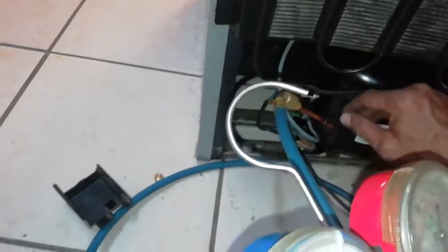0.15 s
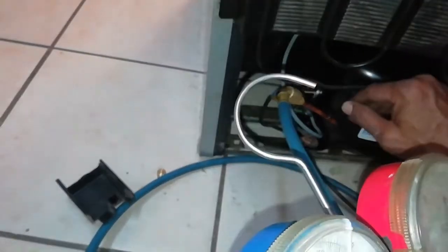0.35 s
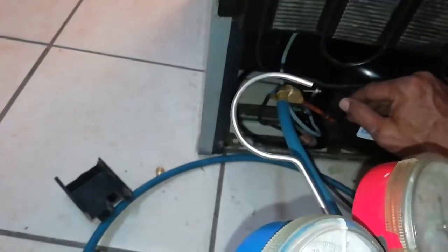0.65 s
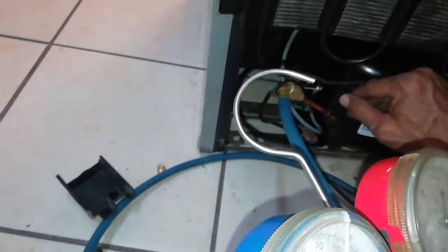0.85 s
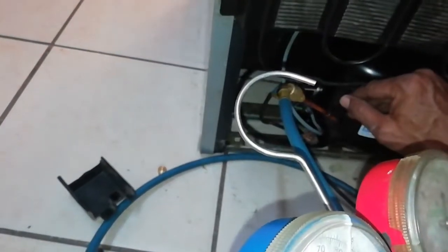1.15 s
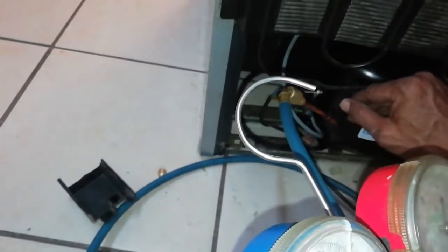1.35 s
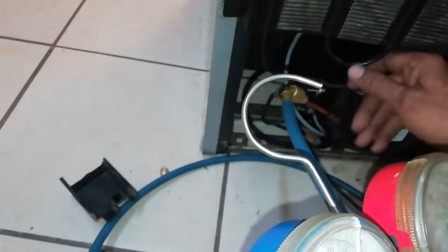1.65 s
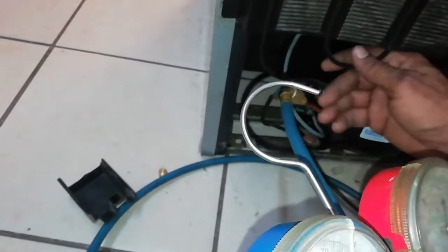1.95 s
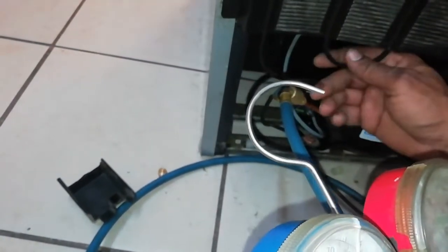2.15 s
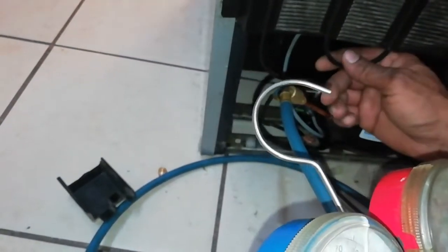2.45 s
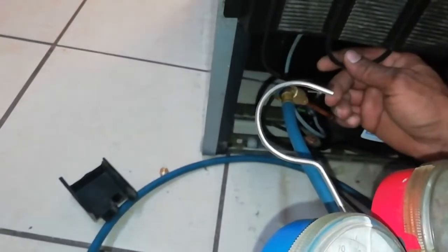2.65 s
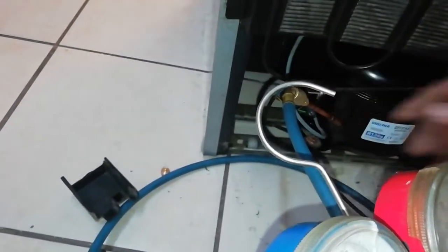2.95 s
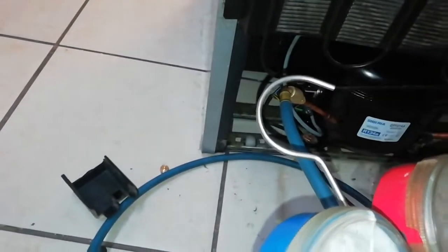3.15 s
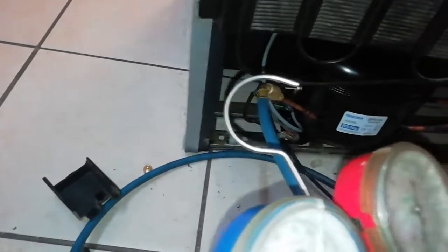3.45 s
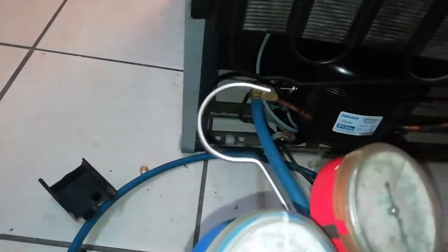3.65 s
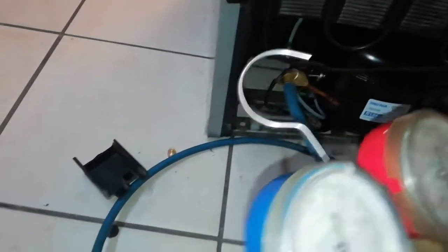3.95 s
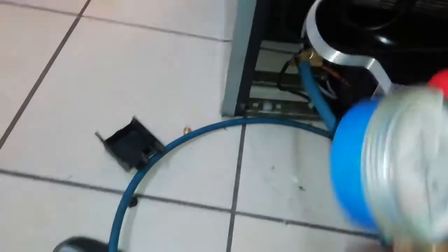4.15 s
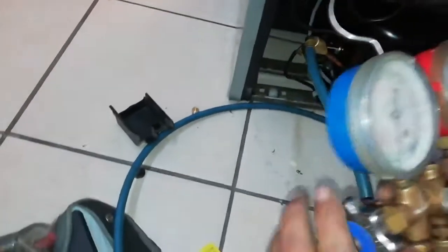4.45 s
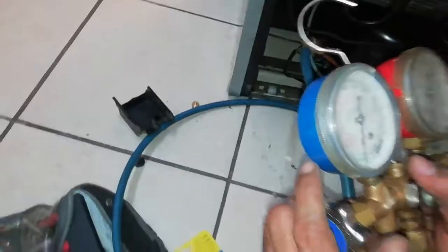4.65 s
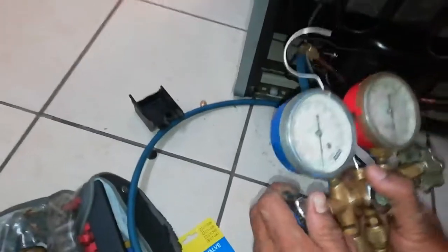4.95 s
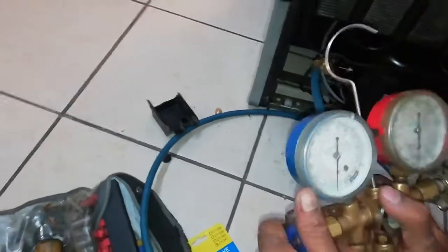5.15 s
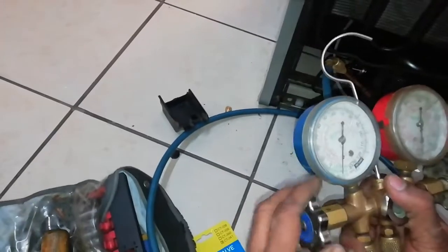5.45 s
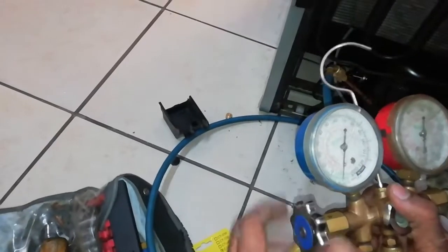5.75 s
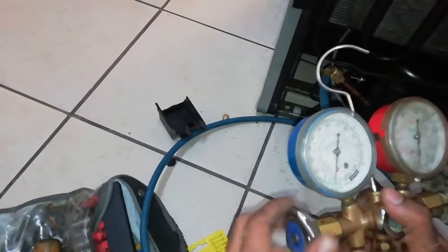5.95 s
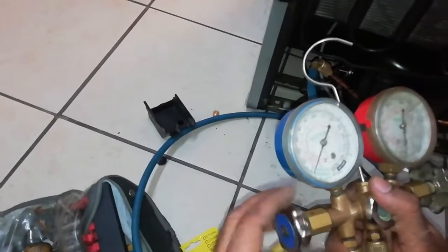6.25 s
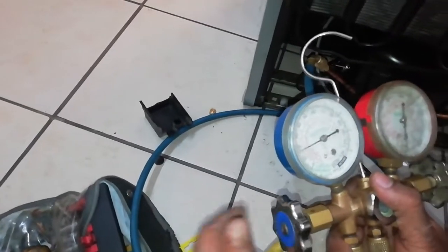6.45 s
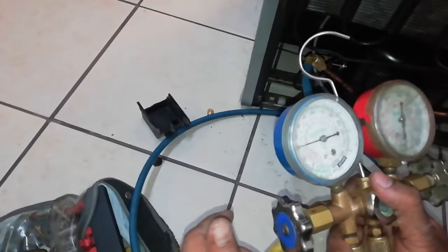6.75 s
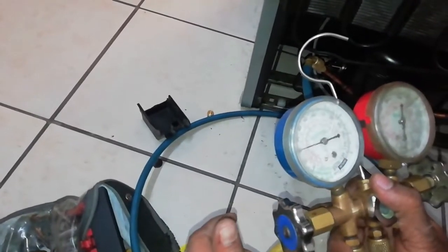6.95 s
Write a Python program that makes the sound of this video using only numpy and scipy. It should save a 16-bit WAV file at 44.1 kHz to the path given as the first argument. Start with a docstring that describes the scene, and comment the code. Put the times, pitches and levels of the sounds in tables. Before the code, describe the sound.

A refrigerator compressor runs throughout in a tiled room: soft low hum, thin raspy buzz and drifting high whines, close to a handheld microphone. Around 1.65-1.75 s a hand lightly clatters the sheet metal; at 1.9 and 2.15 s dry fingers swish on tubing. At 2.8 s a tube is flicked with a brief ring, followed by low cabinet thuds and a scuff to about 3.1 s. A dull tap comes at 3.26 s, soft thumps at 3.75-3.9 s. Faint brass sliding starts near 4.1 s, with knocks and rasp at 4.8 s. At 5.1 s a hard, bright clack snaps amid a rattling cluster, by far the loudest moment. Hollow little knocks continue to 6.1 s. From 6 s a valve opens: bright gas hiss grows to about 6.5 s, with airy rush, half-whistles and another knock cluster at 6.35-6.5 s, over a low drone climbing in pitch. The hiss eases slightly until the end near 7 s.

```python
"""A refrigerator compressor hums, whines and buzzes in a tiled room: shaft-order tones plus a once-a-turn rattle.
Close by, a brass gauge set knocks (decaying modes), scrapes (resonant noise) and gives one sharp clack.
A hand brushes the tubing, bumps the cabinet and flicks the condenser tube: noise and impulses through resonances.
Then a valve opens: refrigerant hisses and half whistles as filtered noise, while a low drone climbs in pitch."""
import sys
import numpy as np
from scipy import signal
from scipy.fft import rfft, irfft, next_fast_len
from scipy.io import wavfile
from scipy.ndimage import uniform_filter1d, map_coordinates

SR = 44100
rng = np.random.default_rng(int(sys.argv[2]) if len(sys.argv) > 2 else 0)


def generate_wav(signal):
    """Clip the signal to [-1, 1] and save it as 16-bit WAV at the path in sys.argv[1]."""
    frames = np.transpose(np.atleast_2d(signal))
    scaled = np.clip(frames, -1, 1) * 32767
    pcm = np.round(scaled).astype(np.int16)
    wavfile.write(sys.argv[1], SR, pcm)


N = 313110
T = np.arange(N) / SR


def amp(db):
    """Amplitude gain of a level in dB."""
    return 10 ** (np.asarray(db) / 20)


def unit(x):
    """x scaled to rms 1."""
    return x / np.sqrt(np.mean(x ** 2) + 1e-20)


def pan(db):
    """Left and right gains of mean power 1; db is left over right."""
    return unit(amp([[db / 2], [-db / 2]]))


def along(points, hz):
    """Interpolates (Hz, value) points on a log frequency axis."""
    f, v = np.transpose(points)
    return np.interp(np.log(hz + 1), np.log(f), v)


def ramp(start_s, length_s, t=T):
    """A steady change from 0 to 1."""
    return np.clip((t - start_s) / length_s, 0, 1)


def arch(start_s, length_s):
    """A half-sine swell, silent outside its span."""
    return np.sin(np.pi * ramp(start_s, length_s))


def hump(peak_s, half_width_s):
    """A bell-shaped swell, down to 1/e at the half width."""
    return np.exp(-((T - peak_s) / half_width_s) ** 2)


def burst(start_s, t60, attack, t=T):
    """Envelope of a blow: exponential attack (s) and 60 dB decay time t60 (s)."""
    age = np.maximum(t - start_s, 0)
    decay = np.exp(-np.minimum(np.log(1000) * age / t60, 50))
    return (1 - np.exp(-age / attack)) * decay


def wobble(rate_hz):
    """A smooth random curve, rate_hz knots a second."""
    coarse = np.linspace(0, T[-1], 2 ** 13)
    knots = rng.standard_normal(2 ** 11)
    return np.interp(T, coarse, map_coordinates(knots, [coarse * rate_hz], mode="wrap"))


def filtered(x, response):
    """x times a complex response of frequency."""
    m = next_fast_len(N + SR // 2)
    return irfft(rfft(x, m) * response(np.fft.rfftfreq(m, 1 / SR)), m)[..., :N]


def coloured(x, spectrum):
    """x shaped by a (Hz, dB) response, at rms 1."""
    return unit(filtered(x, lambda hz: amp(along(spectrum, hz))))


def ringing(x, modes):
    """x through parallel resonances: (Hz, width Hz, dB)."""
    def response(f):
        return sum(amp(db) * 1j * f * w / (c * c - f * f + 1j * f * w) for c, w, db in modes)
    return filtered(x, response)


def rung_noise(modes):
    """Resonances driven by independent left and right noise, at rms 1."""
    return unit(ringing(rng.standard_normal((2, N)), modes))


# Stereo correlation of noise. Each row: frequency in Hz, left-right likeness 0..1.
LIKENESS = [(40, 1), (100, 0.93), (160, 0.87), (290, 0.01), (640, 0), (2000, 0)]


def noise(spectrum):
    """Stereo noise of rms 1, near mono in the bass."""
    def mid_side_gains(hz):
        turn = np.arccos(np.clip(along(LIKENESS, hz), -1, 1)) / 2
        return np.array([np.cos(turn), np.sin(turn)])
    mid, side = filtered(rng.standard_normal((2, N)), mid_side_gains)
    return coloured(np.array([mid + side, mid - side]), spectrum)


def slips():
    """Sparse tiny slips of skin and brass on metal: impulses at the same moments in both ears."""
    slips_per_s = 620
    return unit((rng.random(N) < slips_per_s / SR) * rng.standard_normal((2, N)))


def add(track, start_s, sound):
    """Mixes a short sound into a track in place."""
    part = track[round(start_s * SR):][:len(sound)]
    part += sound[:len(part)]


# Reverberation of the tiled room. Each row: frequency in Hz, t60 in s.
ROOM_T60 = [(150, 0.11), (1000, 0.52), (4000, 0.39), (9000, 0.27), (15000, 0.21)]


def room(x):
    """The tiled room's answer: a noise tail whose frequencies each die at their own speed."""
    hz, t, z = signal.stft(rng.standard_normal((2, SR // 2)), SR, nperseg=256)
    decay = np.exp(-np.log(1000) * t / along(ROOM_T60, hz)[:, None])
    tail = signal.istft(z * decay, SR, nperseg=256)[1]
    tail *= 1 - np.exp(-np.arange(tail.shape[1]) / SR / 0.0014)
    return signal.fftconvolve(x, tail / np.linalg.norm(tail[0]), axes=1)[:, :N]


def nearby(x, count):
    """Early reflections off the floor tiles and the cabinet comb the sound."""
    last_delay_s, echoes_db = 0.008, -5
    echoes = np.zeros((2, round(last_delay_s * SR)))
    for ear in echoes:
        delays = rng.integers(SR // 1000, len(ear), count)
        ear[delays] = amp(echoes_db) * rng.choice([-1, 1], count) / np.sqrt(count)
    echoes[:, 0] = 1  # direct sound
    return signal.fftconvolve(x, echoes / np.linalg.norm(echoes[0]), axes=1)[:, :N]


# Room noise spectrum. Each row: frequency in Hz, relative level in dB.
AIR_SPECTRUM = [(8, -22), (22, 7), (32, 5), (70, 3.5), (130, -5.5), (250, -5), (400, -13.5), (520, -17),
                (900, -21), (1500, -14.5), (3000, -14.5), (8000, -40.5), (15500, -53)]


def air():
    """Steady room noise, strongest in the bass."""
    return amp(-60.5) * noise(AIR_SPECTRUM)


DRONE_START_S, DRONE_HZ, CLIMB_HZ_PER_S = 5.65, 50.3, 7.4
RUMBLE_DB, RUMBLE_START_S, RUMBLE_RISE_S = -50.5, 5.54, 0.68
# Drone partials. Each row: multiple of the pitch, mean peak level in dB, loudest at in s, half width in s.
DRONE_HARMONICS = [(1, -49.5, 5.99, 0.3), (2, -52.5, 6.97, 0.58), (3, -53, 6.8, 0.28)]
# Rumble spectrum. Each row: frequency in Hz, relative level in dB.
RUMBLE_SPECTRUM = [(20, -9), (35, -5), (100, -7), (200, -7), (320, -1.5), (480, -14), (1000, -4),
                   (3000, -30.5)]


def drone():
    """A low, rough drone climbs steadily; its unsteady partials swell and fade over a rumble."""
    hz = DRONE_HZ + CLIMB_HZ_PER_S * np.maximum(T - DRONE_START_S, 0)
    phase = 2 * np.pi * np.cumsum(hz * (1 + 0.012 * wobble(13))) / SR
    partials = np.zeros(N)
    for k, db, peak_s, half_width_s in DRONE_HARMONICS:
        level = amp(db + 5.1 * wobble(14)) * hump(peak_s, half_width_s)
        partials += level * np.sin(k * phase)
    rumble = amp(RUMBLE_DB) * ramp(RUMBLE_START_S, RUMBLE_RISE_S) * noise(RUMBLE_SPECTRUM)
    return partials + rumble


VALVE_S, OPENING_S = 5.954, 0.58  # starts to open, takes this long
FLOW_DB, SAG_DB_PER_S = -39, 4  # gain at full opening; sags as the pressures even out


def flow_db():
    """Flow grows with the square of the valve's opening, then sags."""
    opening = np.maximum(ramp(VALVE_S, OPENING_S), 1e-3)
    sag_db = SAG_DB_PER_S * np.maximum(T - VALVE_S - OPENING_S, 0)
    return FLOW_DB + 20 * np.log10(opening ** 2) - sag_db


RUSH_DB, RUSH_PEAK_S, RUSH_HALF_WIDTH_S = -51, 6.33, 0.3  # surge as the hose fills
# Valve seat hiss. Each row: frequency in Hz, relative level in dB.
HISS_SPECTRUM = [(400, -11.5), (800, -37), (1500, -11), (2100, -12.5), (2600, -30), (3200, -20),
                 (4500, -15), (5600, -15.5), (6600, -6.5), (7500, -1.5), (8000, 4.5), (9300, -2),
                 (9750, -6.5), (12500, -11.5), (14200, -18), (15300, -65)]
# Whistling resonances of the seat. Each row: frequency in Hz, width in Hz, relative level in dB.
WHISTLE_MODES = [(4610, 50, -22), (7200, 110, -21), (7550, 52, -8), (7720, 82, -17), (8000, 85, -24),
                 (8750, 48, 1.5), (9080, 81, -9), (9380, 81, 4), (11780, 64, -19)]
# Gas in the hose. Each row: frequency in Hz, relative level in dB.
RUSH_SPECTRUM = [(300, -9), (1000, 2), (2000, -4.5), (2700, -16), (3500, -4), (5000, -5), (6500, -11),
                 (12000, -32)]


def refrigerant():
    """Gas rushes into the hose, hisses through the narrow valve seat and half whistles in it, in fits."""
    whistle = amp(-0.5 + wobble(8.7)) * pan(7) * rung_noise(WHISTLE_MODES)
    hiss = pan(2.3) * noise(HISS_SPECTRUM)
    seat = amp(flow_db() + 0.7 * wobble(28)) * (hiss + whistle)
    surge = amp(RUSH_DB + wobble(60)) * hump(RUSH_PEAK_S, RUSH_HALF_WIDTH_S)
    return seat + surge * noise(RUSH_SPECTRUM)


TUBE_S, TUBE_DB = 2.807, -46  # the hand leaves the tube with a flick
TAP_S, TAP_DB = 3.259, -44
# Condenser tube modes. Each row: frequency in Hz, relative level in dB, t60 in s.
TUBE_MODES = [(862, 1.5, 0.057), (1330, -16, 0.074), (1850, -9, .07), (2120, -3, .08), (2440, -2, .05),
              (3220, 0, 0.046), (3880, 0, 0.038)]
# Dull tap. Each row: frequency in Hz, relative level in dB.
TAP_SPECTRUM = [(80, -6), (250, 4), (600, -8), (1300, -4), (1900, -27), (5000, -40)]


def condenser():
    """The condenser tube rings briefly as the hand leaves it; a dull tap follows."""
    tube = np.zeros(N)
    t = np.arange(SR // 4) / SR
    for hz, db, t60_s in TUBE_MODES:
        tone = np.sin(2 * np.pi * (hz * t + rng.random()))
        add(tube, TUBE_S, amp(TUBE_DB + db) * burst(0, t60_s, attack=0.00068, t=t) * tone)
    return tube + amp(TAP_DB) * burst(TAP_S, t60=0.04, attack=0.00078) * noise(TAP_SPECTRUM)


CONTACT_DB = -10  # first touch, over the panel level
BOOM_DB, BOOM_T60_RATIO = -11, 2.16  # side wall: gain, t60 over the bump's
SCUFF_S, SCUFF_LENGTH_S, SCUFF_DB = 2.9, 0.068, -52  # the hand scuffs the grille
# Bumps on the cabinet. Each row: start in s, panel gain in dB, low thud gain in dB, thud pitch in Hz, t60 in s.
CABINET_BUMPS = [(1.652, -41, -74, 90, 0.7), (1.656, -45, -64, 90, 0.092), (1.668, -47, -57, 90, 0.076),
                 (1.72, -56, -62, 90, 0.12), (1.756, -49, -62, 90, 0.13), (2.796, -48, -62, 90, 0.29),
                 (2.86, -66, -48, 85, 0.3), (2.9, -57, -39, 92, 0.32), (2.98, -63, -41, 100, 0.2),
                 (3.76, -61, -36.5, 61, 0.19), (3.845, -73, -49, 58, 0.099), (3.894, -74, -45, 74, 0.18)]
# Sheet panels. Each row: frequency in Hz, relative level in dB.
PANEL_SPECTRUM = [(80, -36), (190, -0.5), (320, 1), (480, -1), (850, -4), (1050, -8), (1500, -4),
                  (2100, 2.5), (3500, -36), (9000, -5.5), (15000, -46)]
# Panel resonances. Each row: frequency in Hz, width in Hz, relative level in dB.
PANEL_RESONANCES = [(753, 42, -3), (933, 40, -5.5), (1288, 68, 0.5), (1414, 59, -1), (1613, 14, 3),
                    (1920, 35, -10), (2120, 28, -0.5), (3050, 32, -1.5), (4200, 29, -10)]
# Noise driving the side wall. Each row: frequency in Hz, relative level in dB.
THUD_SPECTRUM = [(25, -37), (60, 3), (90, 4.5), (130, -13), (190, -2), (400, -10), (1000, -54)]
# Big side wall. Each row: frequency in Hz, width in Hz, relative level in dB.
SIDE_WALL_MODES = [(187.7, 16, 0.5), (256, 16, -2.5), (295, 39, -9)]
# Grille resonances. Each row: frequency in Hz, width in Hz, relative level in dB.
GRILLE_MODES = [(1290, 23, 1), (1860, 61, -1), (3030, 55, -1)]


def cabinet():
    """A hand bumps the sheet metal: panels clatter, the side wall booms on, the frame thuds."""
    contact, clatter, boom, thud = np.zeros((4, N))
    for s, panel_db, thud_db, thud_hz, t60_s in CABINET_BUMPS:
        contact += amp(panel_db + CONTACT_DB) * burst(s, t60=0.024, attack=0.0004)
        clatter += amp(panel_db) * burst(s, t60_s, attack=0.0021)
        boom += (amp(panel_db) + amp(thud_db - 2)) * burst(s, BOOM_T60_RATIO * t60_s, attack=0.0094)
        thud += amp(thud_db) * burst(s, t60_s, attack=0.0073) * np.sin(2 * np.pi * thud_hz * (T - s))
    clatter *= unit(amp(0.82 * wobble(110)))
    panels = amp(-7.0) * coloured(slips(), PANEL_SPECTRUM)
    panels += amp(-2.5) * unit(ringing(slips(), PANEL_RESONANCES))
    wall = amp(BOOM_DB) * boom * unit(ringing(noise(THUD_SPECTRUM), SIDE_WALL_MODES))
    scuff = amp(SCUFF_DB) * arch(SCUFF_S, SCUFF_LENGTH_S) * unit(ringing(slips(), GRILLE_MODES))
    return contact * noise(PANEL_SPECTRUM) + clatter * panels + wall + thud + scuff


# Fingers brushing the tubing. Each row: start in s, length in s, peak gain in dB.
FINGER_RUBS = [(1.9, 0.1, -51), (2.145, 0.09, -53.5), (2.85, 0.27, -54.5)]
# Skin on tubing. Each row: frequency in Hz, relative level in dB.
SKIN_SPECTRUM = [(1000, -7), (4000, -4), (7000, 1), (10000, 1.5), (12500, -11), (15500, -17)]


def rubbing():
    """Dry fingers brush along the tubing with a soft, airy swish."""
    swell = sum(amp(db) * arch(s, length_s) for s, length_s, db in FINGER_RUBS)
    return swell * noise(SKIN_SPECTRUM)


LOOSE_HZ, GRIPPED_HZ = 1130, 894  # rings lower once the hand has closed round the gauge set
GRIP_S, GRIP_LENGTH_S = 5.0, 0.076
# Brass and hose sliding. Each row: start in s, length in s, rasp gain in dB, body gain in dB.
SLIDES = [(4.104, 0.3, -57.5, -69.5), (4.343, 0.24, -52.5, -58.5), (4.794, 0.13, -40.5, -44),
          (5.044, 0.073, -31, -38), (5.117, 0.066, -36, -41), (5.462, 0.061, -56, -44.5),
          (6.315, 0.2, -44.5, -55)]
# Brass contact noise. Each row: frequency in Hz, relative level in dB.
METAL_SPECTRUM = [(500, -25), (1500, -5.5), (2200, -16), (2750, -7), (3150, -9), (4000, -5), (4950, -4.5),
                  (5250, -7.5), (5900, -5), (6700, -5), (7900, 0.5), (9100, -0.5), (10200, -17),
                  (11700, -20), (15500, -31)]


def sliding():
    """Stick and slip: a rough rasp that keeps the body of the gauge set ringing."""
    rasp, body = np.zeros((2, N))
    for s, length_s, rasp_db, body_db in SLIDES:
        swell = arch(s, length_s)
        hz = LOOSE_HZ + (GRIPPED_HZ - LOOSE_HZ) * ramp(GRIP_S, GRIP_LENGTH_S, t=s)
        resonance = [(hz, 330, 0)]
        twice_rung = ringing(ringing(rng.standard_normal(N), resonance), resonance)
        rasp += amp(rasp_db) * swell
        body += amp(body_db) * swell * unit(twice_rung)
    catching = unit(amp(4 * wobble(330)))
    return catching * (pan(-2.2) * body + pan(1.7) * rasp * noise(METAL_SPECTRUM))


CLACK_S = 5.098  # the fitting snaps into place
SNAP_DB, CRACK_DB, SIZZLE_DB, RING_DB = -6, -14.5, -20, -20.5
# Snapping fitting. Each row: frequency in Hz, width in Hz, relative level in dB.
SNAP_MODES = [(8200, 310, -6.5), (8630, 260, -6.5), (10730, 310, -27)]
# Brass resonances. Each row: frequency in Hz, width in Hz, relative level in dB.
BRASS_MODES = [(904, 31, 4), (980, 20, -2), (2720, 58, 7), (3170, 50, -7), (4970, 61, 2.5), (6067, 41, 6),
               (7890, 280, 0.5), (9750, 20, -8)]


def clack():
    """A hard metal snap lasting a few ms, far louder at the left, with a crack, a sizzle and a short ring."""
    chatter = np.sqrt(arch(CLACK_S + 0.00077, 0.0047).clip(0))
    snap = amp(SNAP_DB) * pan(14) * chatter * rung_noise(SNAP_MODES)
    crack = amp(CRACK_DB) * burst(CLACK_S, t60=0.028, attack=0.0004) * noise(METAL_SPECTRUM)
    sizzle = amp(SIZZLE_DB) * pan(2) * burst(CLACK_S, t60=0.081, attack=0.0013) * noise(METAL_SPECTRUM)
    ring = amp(RING_DB) * pan(-9) * burst(CLACK_S, t60=0.17, attack=0.0019) * rung_noise(BRASS_MODES)
    return snap + crack + sizzle + ring


BODY_HZ, GRIP_SCATTER, TOUCH_SCATTER_DB = 980, 0.03, 2.5


def touches(start_s, end_s, knock_db, tick_db, count):
    """Light contacts while fingers shift on the knob: rows of (s, knock dB, Hz, tick dB)."""
    times = start_s + (end_s - start_s) * (np.arange(count) + rng.random(count)) / count
    scatter = rng.standard_normal((count, 2)) * [TOUCH_SCATTER_DB, GRIP_SCATTER]
    return [(s, knock_db + force, BODY_HZ * (1 + grip), tick_db + force)
            for s, (force, grip) in zip(times, scatter)]


DAMPING_SCATTER = 0.2
# Contacts on the gauge set. Each row: start in s, relative knock level in dB, pitch in Hz, tick gain in dB.
GAUGE_KNOCKS = [(4.154, -36.5, 680, -63), (4.77, -20, 930, -34.5), (4.811, -48, 1190, -35),
                (4.827, -42, 1130, -28.5), (4.833, -42, 1200, -29), (4.843, -19, 1167, -49),
                (4.861, -32, 1190, -47), (4.884, -42, 1090, -20), (5.024, -28.5, 1075, -34),
                (5.037, -16.5, 953, -38), (5.058, -24, 936, -33), (5.073, -21, 996, -30),
                (5.083, -21, 987, -43), (5.092, -22.5, 1050, -32), (5.102, -6.5, 946, -19.5),
                (5.11, -14.5, 960, -32), (5.128, -37, 980, -23), (5.134, -10.5, 964, -27),
                (5.155, -17, 957, -49), (5.161, -18.5, 930, -40), (5.225, -24, 907, -36),
                (5.366, -27, 995, -37), (5.465, -26, 960, -49), (5.472, -22.5, 982, -27.5),
                (5.605, -26, 992, -72), (5.69, -20.5, 980, -48), (5.725, -25.5, 987, -51),
                (5.814, -20, 974, -42), (5.93, -32, 1000, -69), (5.973, -34, 980, -65),
                (6.048, -25, 1000, -63), (6.082, -32, 1015, -72), (6.351, -18, 940, -43),
                (6.373, -24.5, 1004, -38), (6.392, -22.5, 970, -37), (6.41, -19.5, 984, -53),
                (6.418, -19, 993, -69), (6.426, -19.5, 990, -62), (6.449, -33, 1020, -52),
                (6.475, -19, 955, -60), (6.504, -26.5, 820, -59)]
# Gauge set body modes. Each row: ratio to the pitch, mean relative level in dB, t60 in s before damping scatter.
BODY_MODES = [(.79, -12, 0.034), (0.885, -8.5, 0.034), (1.002, 0.5, 0.029), (1.4, -13, 0.027),
              (1.8, -4.5, 0.0085)]
# Mid-pitched click of each contact on the gauge set. Each row: frequency in Hz, relative level in dB.
CLICK_SPECTRUM = [(900, -40), (1500, 1), (2300, 2), (2800, 4), (3500, 8), (4300, 2), (5200, -41),
                  (12000, -39)]


def gauges():
    """Contacts ring the hollow gauge set at a pitch set by the grip and tick on its brass; damping varies."""
    body, ticks, clicks, brass = np.zeros((4, N))
    t = np.arange(SR // 8) / SR
    contact = (1 - np.exp(-t / 0.0023)) ** 2
    for s, db, hz, tick_db in GAUGE_KNOCKS + touches(3.85, 6.3, knock_db=-43, tick_db=-62, count=9):
        damping = np.exp(DAMPING_SCATTER * rng.standard_normal())
        ring = np.zeros(len(t))
        for ratio, mode_db, t60_s in BODY_MODES:
            level = amp(mode_db + rng.standard_normal() - 60 * damping * t / t60_s)
            ring += level * np.sin(2 * np.pi * (ratio * hz * t + rng.random()))
        add(body, s - 0.001, amp(db - 3.5) * damping * contact * ring)
        add(ticks, s, amp(tick_db) * burst(0, t60=0.024, attack=0.0011, t=t))
        hardness = amp((db + tick_db) / 2)  # harder contacts click and ring more
        add(clicks, s, hardness * burst(0, t60=0.039, attack=0.0004, t=t))
        add(brass, s, hardness * burst(0, t60=0.077, attack=0.001, t=t))
    ticking = pan(4) * ticks * noise(METAL_SPECTRUM)
    clicking = amp(-9) * pan(0) * clicks * noise(CLICK_SPECTRUM)
    singing = amp(-17.5) * pan(-7.5) * brass * rung_noise(BRASS_MODES)
    return pan(-4.5) * body + ticking + clicking + singing


# Slow changes: (start s, length s).
LET_GO = (1.3, 0.43)  # the hand lets go of the service tube
DRAW_BACK = (4.18, 0.28)  # the microphone draws back
LATE_CHANGE = (5.39, 0.73)  # the shell tones weaken and the hum overtones grow


def loudness(db, let_go_db, draw_back_db, late_db):
    """Gain of one part of the compressor through the three slow changes."""
    changes_db = let_go_db * ramp(*LET_GO) + draw_back_db * ramp(*DRAW_BACK) + late_db * ramp(*LATE_CHANGE)
    return amp(db + changes_db)


# Depth of the drifting standing waves. Each row: frequency in Hz, rms depth in dB.
FADING_DEPTH = [(2500, 0), (5000, 0.5), (9000, 2)]


def fading(x):
    """The hand-held microphone drifts through standing waves: treble bands swell and fade on their own."""
    hz, _, z = signal.stft(x, SR, nperseg=512)
    field = uniform_filter1d(rng.standard_normal(z.shape), size=4, axis=1)
    field = uniform_filter1d(field, size=50, axis=2)
    field = unit(uniform_filter1d(field, size=20, axis=2))
    gain = amp(along(FADING_DEPTH, hz)[:, None] * field)
    return signal.istft(z * gain, SR, nperseg=512)[1][:, :N]


PHASE_SCATTER_RAD = 1.0


def tones(turns, rows, wander_db):
    """Shaft orders near a common phase each turn; standing waves scatter their phases and levels drift."""
    out = np.zeros((2, N))
    for order, db, pan_db in rows:
        phase = 2 * np.pi * order * turns + PHASE_SCATTER_RAD * rng.standard_normal()
        lag = rng.choice([-1, 1]) * np.pi / 5  # opposite in the two ears
        drift_db = wander_db * (wobble(1.797) + 0.47 * wobble(9.4))
        out += pan(pan_db) * amp(db + drift_db) * np.sin(phase + np.array([[lag], [-lag]]))
    return out * np.sqrt(2)


def stroke(turns, decay_turns):
    """The piston's rattle, alike on every turn, shifting slowly as the microphone moves."""
    size = 2 ** 12
    cycles = rng.standard_normal((2, 2, size)) * np.exp(-np.arange(size) / size / decay_turns)
    z = rfft(cycles)
    cycles = irfft(z / np.sqrt(np.abs(z)))  # evens out the harmonics
    first, second = cycles[..., (turns % 1 * size).astype(int)]
    drift = 0.5 * T + 0.55 * wobble(1.14)
    return unit(np.cos(drift) * first + np.sin(drift) * second)


SHAFT_HZ, MAINS_HZ = 49.22, 50
IN_STEP_S = 3.66  # shaft and mains nearly in step
HUM_WANDER_DB = 1.4
# Gains in dB: base, change on letting go, on drawing back, in the late change.
HUM_GAINS_DB = (-62, 3, 0.5, 4)
OVERTONE_GAINS_DB = (-58.5, -4.5, -3.5, 14)
# Low hum. Each row: shaft order, relative level in dB.
LOW_HUM = [(1, 2), (2, 0.5)]
# Hum overtones. Each row: shaft order, relative level in dB.
OVERTONES = [(3, -12.5), (4, -12.5), (5, -8), (6, -9.5), (7, -17), (9, -18.5), (14, -15)]
# Motor windings. Each row: multiple of the mains, mean level in dB.
WINDING_HUM = [(2, -63), (4, -75), (6, -78), (7, -83)]


def hum(turns):
    """The lowest shaft orders and the motor's mains hum, beating slowly against each other."""
    offsets = rng.random(2 ** 5)  # one phase per order, shared by shaft and mains

    def partials(rows, cycles):
        return sum(amp(db + HUM_WANDER_DB * wobble(5.5)) * np.sin(2 * np.pi * (k * cycles + offsets[k]))
                   for k, db in rows)

    shaft = turns - SHAFT_HZ * IN_STEP_S
    low = loudness(*HUM_GAINS_DB) * partials(LOW_HUM, shaft)
    overtones = loudness(*OVERTONE_GAINS_DB) * partials(OVERTONES, shaft)
    return low + overtones + partials(WINDING_HUM, MAINS_HZ * (T - IN_STEP_S))


WANDER_DB, LEAD_WANDER_DB, WHINE_WANDER_DB = 0.5, 1.86, 1.5  # slow drift of each tone
FLUTTER_DB = 0.9  # from stroke to stroke
# Gains in dB: base, change on letting go, on drawing back, in the late change.
MIDDLE_GAINS_DB = (-64.5, 2.5, 1, -7)
HIGH_GAINS_DB = (-58, -1, -4.5, -10)
WHINE_GAINS_DB = (-66.5, 5.5, -10, 1.5)
BUZZ_GAINS_DB = (-57.5, 2.5, 0, -1)
SHRILL_ORDER = 138
# Strongest shell and tube tones. Each row: shaft order, left over right in dB, base gain in dB, change in dB
# on letting go, on drawing back, in the late change.
LEADS = [(13, -17, -65, 0.5, -5, -6), (43, -3, -69.5, 5.5, 6, -9), (56, 11, -58.3, -1.5, -1, -5),
         (94, 1, -71.5, -6, -2, 0), (154, 11, -65.5, 1, 3.5, -1)]
# Middle tones. Each row: shaft order, relative level in dB, left over right in dB.
MIDDLES = [(40, -8, -10), (42, -7, -3), (45, -10, -8), (47, -12, 6)]
# High tones. Each row: shaft order, relative level in dB, left over right in dB.
HIGHS = [(55, -16, 0), (59, -12, -8), (60, -11, 6), (62, -8, 10), (63, -16, 0), (66, -20, 0)]
# Tones that stand out of the buzz. Each row: shaft order, relative level in dB, left over right in dB.
WHINE_TONES = [(119, -16, 8), (124, -13, 0), (140, -12, -6), (152, -8, 0), (165, -11, 6), (173, -14, 4),
               (182, -14, 8), (207, -15.5, 10)]
# Tones that each swell once and fade, the last during the hiss.
# Each row: shaft order, loudest at in s, half width in s, peak gain in dB.
SWELLING_TONES = [(95, 1.75, 0.55, -67), (207, 3.3, 0.6, -69), (194, 3.3, 0.7, -68), (152, 4.45, 0.2, -63),
                  (43, 4.5, 0.35, -63), (41, 6.75, 0.3, -58.5)]
# Shrillest tone, fading in and out. Each row: time in s, gain in dB.
SHRILL_GAIN = [(0, -68), (.6, -64), (.8, -68), (1.1, -63), (1.35, -67), (1.8, -61), (2.2, -59.5),
               (2.35, -67), (2.6, -61.5), (3.1, -64.5), (3.45, -55), (3.9, -63), (4.35, -63), (4.6, -58),
               (5.3, -83), (5.9, -70), (7.1, -79)]
# Buzz. Each row: frequency in Hz, relative level in dB.
BUZZ_SPECTRUM = [(400, -8), (800, -6.5), (1400, -3.5), (1750, -17), (2100, 4), (2480, -19.5), (3000, 7.5),
                 (3550, -12), (4350, -7.5), (4650, -4), (5100, -13.5), (5800, -0.5), (7700, -1.5),
                 (9800, -6.5), (11500, -15.5), (15500, -30)]
# Dense whirr of shell and tubes. Each row: frequency in Hz, width in Hz, relative level in dB.
WHIRR_MODES = [(4070, 61, -1), (5460, 59, 1), (5910, 50, 7), (6960, 83, 5), (7800, 64, -7),
               (7510, 190, -5.5), (8200, 140, 6), (8400, 82, -4), (8750, 220, -3.5), (9480, 140, 0.5),
               (9600, 62, -11), (10100, 75, -18)]


def compressor():
    """One piston stroke per turn: low hum, singing shell and a thin buzz that rings shell and tubes."""
    turns = SHAFT_HZ * T + 0.0012 * wobble(3)
    lead = sum(loudness(*gains_db) * tones(turns, [(order, 0, pan_db)], LEAD_WANDER_DB)
               for order, pan_db, *gains_db in LEADS)
    shell = loudness(*MIDDLE_GAINS_DB) * tones(turns, MIDDLES, WANDER_DB)
    shell += loudness(*HIGH_GAINS_DB) * tones(turns, HIGHS, WANDER_DB)
    whine = loudness(*WHINE_GAINS_DB) * tones(turns, WHINE_TONES, WHINE_WANDER_DB)
    shrill = amp(np.interp(T, *np.transpose(SHRILL_GAIN))) * tones(turns, [(SHRILL_ORDER, 0, 5)], WANDER_DB)
    swells = sum(hump(s, half_width_s) * tones(turns, [(order, db, 0)], WANDER_DB)
                 for order, s, half_width_s, db in SWELLING_TONES)

    gas = unit(rng.standard_normal((2, N)) * np.exp(-(turns % 1) / 14))  # sags only slightly in each turn
    drive = (stroke(turns, decay_turns=1.0) + 0.43 * gas) * amp(0.43 * wobble(70))  # uneven strokes
    rattle = amp(-0.5) * coloured(drive, BUZZ_SPECTRUM)
    whirr = amp(-7.5) * unit(ringing(drive, WHIRR_MODES))
    buzz = loudness(*BUZZ_GAINS_DB) * pan(3.4) * (rattle + whirr)

    flutter = amp(FLUTTER_DB * wobble(SHAFT_HZ))
    steady_field = flutter * (shell + shrill + swells)
    return hum(turns) + steady_field + fading(flutter * (lead + whine) + buzz)


def scene():
    """Handling sounds with room tail, over refrigerant, drone, air and compressor."""
    handling = gauges() + nearby(sliding(), count=8) + rubbing() + clack() + cabinet() + condenser()
    steady = compressor() + air() + drone()
    return handling + amp(-8.5) * room(handling) + refrigerant() + steady


def record(dry):
    """Clips just under full scale, then removes everything above the band limit."""
    ceiling, top_hz = 0.88, 15800
    return filtered(np.clip(dry, -ceiling, ceiling), lambda hz: hz < top_hz)


dry = scene()
out = record(dry)
generate_wav(out)
```